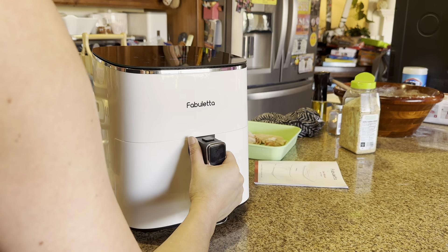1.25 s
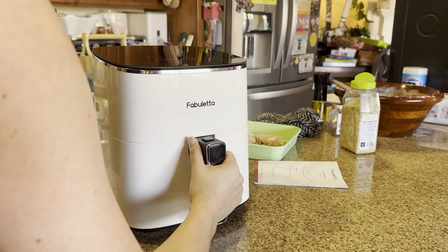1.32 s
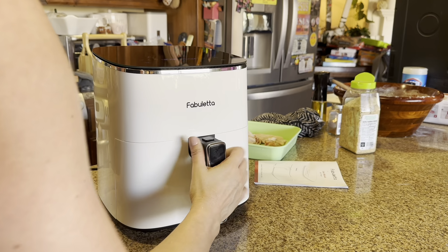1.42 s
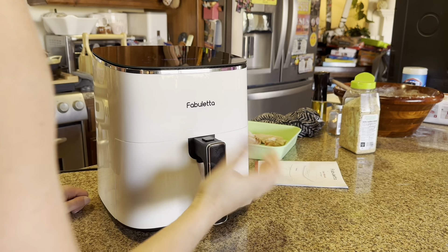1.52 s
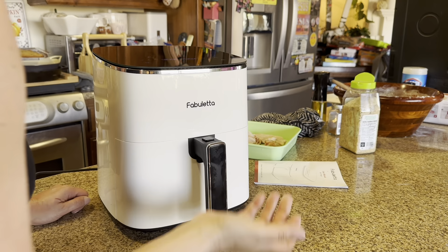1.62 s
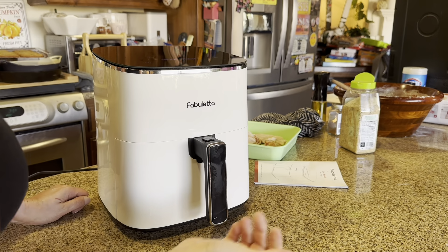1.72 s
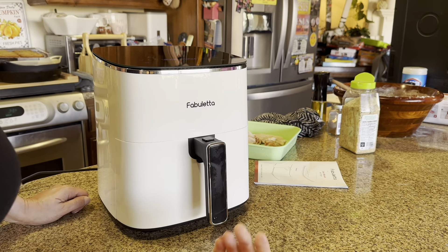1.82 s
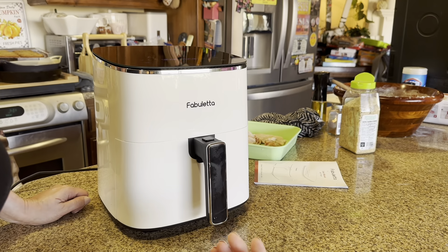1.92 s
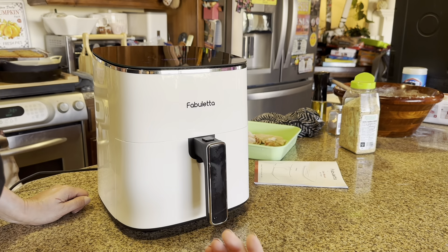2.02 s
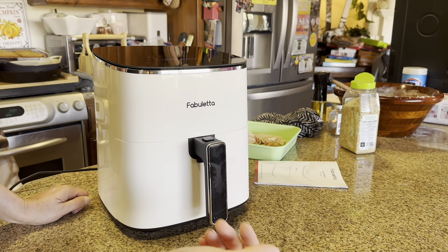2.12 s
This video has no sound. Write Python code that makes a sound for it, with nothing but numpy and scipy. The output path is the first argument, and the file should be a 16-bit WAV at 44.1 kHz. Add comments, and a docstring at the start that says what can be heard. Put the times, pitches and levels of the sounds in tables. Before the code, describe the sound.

An air fryer drawer slides in, knocking and scraping, then clunks and latches closed.

```python
"""Air fryer basket pushed home

Close up on a kitchen counter, the basket knocks and scrapes along its rails, ringing the pan and
rattling the plastic housing. It slams into the end stop, the latch snaps and its spring rings on.
A low boom lingers, the released handle ticks twice, and the small kitchen hums underneath.
Rings and thuds are decaying sines; clatter, clicks and scrape are shaped noise."""
import sys
import numpy as np
from scipy import signal
from scipy.fft import rfft, irfft, next_fast_len
from scipy.io import wavfile
from scipy.ndimage import uniform_filter1d

SR = 44100
rng = np.random.default_rng(int(sys.argv[2]) if len(sys.argv) > 2 else 0)


def unload_audio(sound):
    """Save the sound as a 16-bit wav file, at the path given as the first command line argument."""
    columns = np.transpose(np.atleast_2d(sound))
    # keep every value between -1 and 1, then stretch to whole-number steps
    steps = np.round(np.clip(columns, -1, 1) * 32767)
    wavfile.write(sys.argv[1], SR, steps.astype(np.int16))


N = 94815

# Hits on the rails, then on the end stop: (time [s], clatter [dB], ring [dB], contact low-pass [Hz],
# thud [dB], favoured pitch [Hz], ring length [ratio])
RAIL_HITS = [(.193, -28.5, -23.5, 1500, -44, 384, 0.96), (.2425, -23, -17.5, 1280, -32.5, 446, 1.08),
             (.277, -41, -30.5, 530, -46.5, 480, 0.25), (.4375, -25.5, -19.5, 2500, -22.5, 394, 0.61),
             (.451, -24, -26.5, 900, -21.5, 386, 0.45), (.502, -34, -29, 1010, -46.5, 480, 0.49),
             (.584, -41, -34.5, 1210, -31.5, 304, 1.1), (.667, -29, -34, 1200, -52.5, 690, 0.71),
             (.673, -25.5, -21.5, 820, -39, 387, 0.82), (.703, -37.5, -26, 700, -38.5, 415.3, 0.48),
             (.748, -30.5, -41.5, 2344, -47.5, 1500, 0.31), (.756, -28, -30.5, 1000, -35.5, 332, 1.2),
             (.802, -27.5, -27.5, 1100, -55, 595, 0.23), (.814, -23, -25, 1200, -32, 690, 1.2),
             (.843, -35, -33, 800, -44, 500, 0.81), (.916, -34, -31, 2628, -47, 600, 0.35),
             (.974, -28.5, -37, 2400, -51.5, 720, 0.37), (.994, -20.5, -19.5, 1400, -25.5, 720, 1.8),
             (1.024, -27.5, -40.5, 2000, -36, 330, .7)]
STOP_HITS = [(1.0485, -21, -18, 1450, -38, 590, 0.23), (1.060, -18, -28.5, 3000, -35, 1000, 0.48),
             (1.067, -15, -12, 1817, -17.5, 537, 0.8), (1.080, -18, -20, 992, -25, 260.4, .9),
             (1.092, -20.5, -29, 1400, -22.5, 740, 0.4), (1.119, -27.5, -25.5, 1200, -20.5, 890, 0.8)]
# Ring of the loose pan, then of the closed cooker: (pitch [Hz], level [dB], t60 [s])
PAN_MODES = [(261.1, 1.5, 0.14), (297.6, -4, 0.12), (348.7, -3, 0.077), (396.7, -6, 0.069),
             (481.9, -2.5, .2), (542, -6.5, 0.14), (640, -10.5, .08), (720, -12.5, .09), (875, -4.5, .08),
             (1019, -4, .07), (1117, -9.5, 0.069), (1292, -10, .09), (1610, -14, .1), (2100, -12, 0.12)]
COOKER_MODES = [(253.4, 4.5, 0.18), (362, -5.5, .13), (521.4, -2, .2), (568, -1.5, 0.077),
                (622.4, -4, 0.13), (690, -4.5, 0.11), (790, -5, .18), (855, -9, 0.24), (910, -11, 0.16),
                (1107, -9, .2), (1219, -4.5, .19), (1343, -8.5, 0.16), (1434, -11.5, 0.17), (1500, -8, .15)]
def basket():
    """The loose pan knocks along the rails, then hits the stop and rings the whole cooker."""
    return impacts(RAIL_HITS, PAN_MODES) + impacts(STOP_HITS, COOKER_MODES)


# Thud of the housing on its feet: (pitch [Hz], level [dB], t60 [s])
THUD_MODES = [(104.3, -9, 0.29), (124.9, 0.5, 0.31), (146.9, -0.5, 0.12), (184.8, 4.5, .16),
              (207.5, -9, 0.27), (264.6, -12, 0.3)]
# Tone of the plastic clatter: (frequency [Hz], gain [dB])
HOUSING_EQ = [(60, -34.5), (170, -6), (300, 3), (650, 0), (1000, -3.5), (1500, -7.5), (2100, -5.5),
              (3000, -11), (7000, -13.5), (16000, -17.5)]
def impacts(hits, body):
    """Each hit rattles the housing, rings the struck body and thuds through the feet."""
    out = np.zeros((2, N))
    thud = modes(THUD_MODES, size=16000)
    thud /= np.abs(thud).max()
    for s, clatter_db, ring_db, cutoff_hz, thud_db, favoured_hz, length in hits:
        clatter = burst(HOUSING_EQ, rise_s=0.00026, t60=0.074, size=6000)
        ring = body_ring(body, favoured_hz, length)
        add(out, s, set_attack(soften(clatter, cutoff_hz), clatter_db))
        add(out, s, set_attack(soften(ring, cutoff_hz), ring_db))
        add(out, s, thud * undb(thud_db))
    return out


FAVOUR_DB, FAVOUR_OCTAVES = 7, 0.18
def body_ring(body, favoured_hz, length):
    """Each contact point favours some modes; a pressed basket rings shorter."""
    hz, db, t60 = np.array(body).T
    boost_db = FAVOUR_DB * np.exp(-.5 * (np.log2(hz / favoured_hz) / FAVOUR_OCTAVES) ** 2)
    return modes(zip(hz, db + boost_db, t60 * length), size=14000)


# Sharp contacts of plastic edges and latch: (time [s], level [dB], low-pass [Hz])
EDGE_HITS = [(0.0615, -61, 9100), (0.1901, -42, 6900), (0.1973, -36.5, 2720), (0.2389, -48, 7000),
             (0.4399, -39, 8170), (0.4394, -23.5, 2100), (.613, -51, 5000), (0.6428, -47.5, 4920),
             (0.6683, -50.5, 6680), (0.746, -42.5, 7920), (0.9156, -37.5, 13100), (0.9734, -32.5, 10940),
             (1.0242, -41, 7000), (1.055, -28.5, 10000), (1.0606, -27.5, 16000), (1.066, -21.5, 15920),
             (1.068, -27, 14570), (1.094, -35, 8000)]
# Bright snap of hard plastic: (frequency [Hz], gain [dB])
SNAP_EQ = [(200, -14.5), (1500, 5), (3000, -1), (4500, -1.5), (6300, -0.5), (8100, 1.5), (9500, 3.5),
           (13000, 5.5), (16000, 3)]
def edge_clicks():
    """Hard edges meet in short, crisp snaps."""
    out = np.zeros((2, N))
    for s, db, cutoff_hz in EDGE_HITS:
        snap = burst(SNAP_EQ, rise_s=.00015, t60=0.028, size=3000)
        add(out, s, set_attack(soften(snap, cutoff_hz), db))
    return out


# Crack of the catch and zing of the spring: (frequency [Hz], gain [dB])
CATCH_EQ = [(1000, -26), (3500, -3.5), (5000, 1), (6300, 1), (7800, 6.5), (9300, -10), (12000, -1.5),
            (14000, 4), (16000, -2.5)]
SPRING_EQ = [(1500, -18.5), (3500, -8), (5600, 9), (6500, 8.5), (7600, 5), (8900, -18), (15000, -17.5)]
def latch():
    """The latch drops into its catch and the spring rings on."""
    out = np.zeros((2, N))
    catch = burst(CATCH_EQ, rise_s=0.00088, t60=0.0081, size=3000)
    spring = burst(SPRING_EQ, rise_s=0.003, t60=0.24, size=24000)
    add(out, 1.0767, set_attack(catch, db=-19))
    add(out, 1.080, set_attack(spring, db=-38.5))
    return out


# Fader rides for the rub of the rails and the hiss of the runners: (time [s], level [dB])
RUB_RIDE = [(0, -71.5), (.17, -64.5), (.25, -38.5), (.42, -103), (.48, -41), (.55, -39.5), (.64, -33.5),
            (.72, -41), (.8, -35.5), (.9, -41.5), (.97, -33), (1.05, -26), (1.12, -55.5), (1.25, -75)]
HISS_RIDE = [(0, -54.5), (.2, -53), (.42, -55.5), (.55, -66), (.65, -67.5), (.73, -63.5), (.77, -48),
             (.9, -47.5), (.94, -47.5), (1.05, -54.5), (1.15, -72.5)]
# Hollow tone of the rub: (frequency [Hz], gain [dB])
RUB_EQ = [(80, -10), (250, 5), (500, 6.5), (900, -2.5), (1900, -7), (3000, -16.5), (4500, -21.5),
          (8500, -24), (15000, -22.5)]
GRAINS_PER_S, GRAIN_SCATTER_DB = 5000, 1.8
JUDDER_DB, JUDDER_PER_S = 2, 90
def scrape():
    """Tiny catches roughen a hollow rub and a fine hiss; both judder as the basket sticks and slips."""
    catches = rng.random(N) < GRAINS_PER_S / SR
    strength = undb(GRAIN_SCATTER_DB * np.minimum(rng.exponential(size=N), 5))
    grains = unit(catches * strength)
    grit = np.sqrt(np.abs(uniform_filter1d(grains ** 2, size=40)))
    judder = np.interp(np.arange(N) / SR * JUDDER_PER_S, np.arange(1000), rng.standard_normal(1000))
    roughness = grit * undb(JUDDER_DB * judder)
    rub = unit(colour(noise(N) * roughness, RUB_EQ)) * fader(RUB_RIDE)
    hiss = unit(colour(noise(N) * roughness, SNAP_EQ)) * fader(HISS_RIDE)
    return rub + hiss


# Blows that wake the boom: (time [s], level [dB])
BOOM_HITS = [(0.2424, -50), (0.755, -38.5), (1.0655, -36)]
BOOM_HZ, BOOM_T60_S = 63.23, 1.7
ROCK_S, ROCK_DB, ROCK_HZ, ROCK_T60_S = .444, -28.5, 69, 0.25
def boom():
    """The cooker rocks at the first hard shove; heavier blows leave a long low ring."""
    out = np.zeros((2, N))
    add(out, ROCK_S, modes([(ROCK_HZ, ROCK_DB, ROCK_T60_S)], size=16000))
    for s, db in BOOM_HITS:
        add(out, s, modes([(BOOM_HZ, db, BOOM_T60_S)], size=N))
    return soften(out, cutoff_hz=200)


# Handle ticks: (time [s], level [dB])
HANDLE_HITS = [(1.8076, -52), (1.9657, -67)]
# Their thin tone: (frequency [Hz], gain [dB])
HANDLE_EQ = [(300, -11), (1500, -2), (2100, 4.5), (3200, -6.5), (3900, -2), (4350, 5.5), (5500, -11),
             (8800, -8), (11000, -14), (16000, -18)]
def handle_ticks():
    """The released handle settles with faint ticks."""
    out = np.zeros((2, N))
    for s, db in HANDLE_HITS:
        tick = burst(HANDLE_EQ, rise_s=.00015, t60=0.05, size=4000)
        add(out, s, set_attack(tick, db))
    return out


# Reverb decay: (frequency [Hz], t60 [s])
REVERB_DECAY = [(100, 0.49), (400, 0.35), (1500, 0.42), (7000, 0.46), (15000, .22)]
# Reverb tone: (frequency [Hz], gain [dB])
REVERB_EQ = [(100, -2.5), (300, -6.5), (700, -2), (1500, -2.5), (4000, 0.5), (8000, -1.5), (11000, -2.5),
             (15000, -2.5)]
REVERB_DB, PREDELAY_S, REVERB_RISE_S = -5, 0.0017, 0.0027
def room(x, size=26000):
    """Diffuse kitchen reverb, each octave with its own decay."""
    t = np.arange(size) / SR
    hz = np.arange(size // 2 + 1) * SR / size
    wash = rfft(noise(size, wider_db=3.5))
    octaves_hz = 62.5 * 2. ** np.arange(9)
    tail = np.zeros((2, size))
    for centre in octaves_hz:
        band = at_hz(list(zip(octaves_hz, octaves_hz == centre)), hz)
        tail += irfft(wash * band) * fade(t, at_hz(REVERB_DECAY, centre))
    tail *= np.clip((t - PREDELAY_S) / REVERB_RISE_S, 0, 1)
    response = colour(unit(tail), REVERB_EQ) / np.sqrt(size)
    return signal.fftconvolve(x, response, axes=-1)[:, :N] * undb(REVERB_DB)


# Dark bed of rumble: (frequency [Hz], gain [dB])
RUMBLE_EQ = [(18, -36), (30, -23.5), (53, -6), (90, -6.5), (124, -8.5), (145, -6), (239, -8.5), (404, -5.5),
             (540, -13), (584, -18.5), (721, -18), (9220, -50), (16000, -63.5)]
# Hum tones: (pitch [Hz], level [dB])
HUM_TONES = [(120, -62), (241, -65.5), (405, -66)]
RUMBLE_DB = -54.5
def room_tone():
    """Kitchen appliances rumble and hum steadily."""
    t = np.arange(N) / SR
    hum = sum(undb(db) * np.sqrt(2) * np.sin(2 * np.pi * (hz * t + rng.random()))
              for hz, db in HUM_TONES)
    return unit(colour(noise(N), RUMBLE_EQ)) * undb(RUMBLE_DB) + hum


# Stereo spread: (frequency [Hz], side minus mid [dB])
SPREAD = [(100, -17.5), (300, -14.5), (700, -8), (1400, -7), (3000, -1.5), (6000, 0), (9000, -6),
          (14000, -8.5)]
def noise(size, wider_db=0):
    """Stereo noise, narrow in the bass and wide in the treble."""
    mid, side = rfft(rng.standard_normal((2, size)))
    width = undb(at_hz(SPREAD, np.arange(len(mid)) * SR / size) + wider_db)
    left_right = mid + width * side * np.array([[1], [-1]])
    return irfft(left_right / np.sqrt(1 + width ** 2), size)


def burst(eq, rise_s, t60, size):
    """Crowded, quickly damped modes, played as a burst of shaped noise."""
    t = np.arange(size) / SR
    attack = 1 - np.exp(-t / rise_s)
    return colour(noise(size) * attack * fade(t, t60), eq)


def modes(table, size):
    """Struck modes as decaying sines; neighbours swing in opposite directions."""
    t = np.arange(size) / SR
    return sum((-1) ** k * undb(db) * np.sin(2 * np.pi * hz * t) * fade(t, t60)
               for k, (hz, db, t60) in enumerate(table))


def colour(x, eq):
    """Minimum-phase EQ through (frequency [Hz], gain [dB]) points."""
    n = next_fast_len(x.shape[-1] + 4096, True) // 2 * 2
    gain = undb(at_hz(eq, np.arange(n // 2 + 1) * SR / n))
    cepstrum = irfft(np.log(gain))
    cepstrum[1:n // 2] *= 2  # folded forward, so nothing rings ahead of a hit
    cepstrum[n // 2 + 1:] = 0
    return irfft(rfft(x, n) * np.exp(rfft(cepstrum)))[..., :x.shape[-1]]


def soften(x, cutoff_hz):
    """Low-pass: a softer contact excites less treble."""
    return signal.sosfilt(signal.butter(3, cutoff_hz, fs=SR, output="sos"), x)


def set_attack(x, db):
    """Set the rms level of a hit's first 10 ms."""
    return x * undb(db) / np.sqrt(np.mean(x[..., :SR // 100] ** 2))


def fade(t, t60):
    """Exponential decay by 60 dB in t60 seconds."""
    return np.exp(-np.log(1000) * t / t60)


def fader(ride):
    """Gain through (time [s], level [dB]) points, silent after the last."""
    return undb(np.interp(np.arange(N) / SR, *np.array(ride).T, right=-200))


def at_hz(points, hz):
    """Read a table on a log-frequency axis."""
    freqs, values = np.array(points, float).T
    return np.interp(np.log(np.maximum(hz, 1)), np.log(freqs), values)


def undb(db):
    """Decibels to gain."""
    return 10 ** (np.asarray(db) / 20)


def unit(x):
    """Scale to an rms of one."""
    return x / np.sqrt(np.mean(x ** 2))


def add(out, s, x):
    """Mix a sound in at s seconds."""
    i = int(s * SR)
    out[:, i:i + x.shape[-1]] += x[..., :N - i]


# Pan across the spectrum: (frequency [Hz], left minus right [dB])
PANNING = [(100, 0), (350, -0.74), (700, -0.1), (2800, -0.5), (5500, 3.5), (9000, 2), (14000, -0.2)]
LAG_S, LAG_TOP_HZ = 4.5e-5, 2500
def scene():
    """The basket in its kitchen, a little to the left."""
    close = basket() + edge_clicks() + latch() + handle_ticks() + scrape()
    left, right = close + room(close) + boom() + room_tone()
    hz = np.arange(N // 2 + 1) * SR / N
    lag_s = LAG_S / (1 + (hz / LAG_TOP_HZ) ** 2)  # the left ear leads in the lows and mids
    right = irfft(rfft(right) * np.exp(-2j * np.pi * hz * lag_s), N)
    return np.array([colour(left, [(f, db / 2) for f, db in PANNING]),
                     colour(right, [(f, -db / 2) for f, db in PANNING])])


# Overall tone: (frequency [Hz], gain [dB])
OUTPUT_EQ = [(20, -15), (45, -3), (60, 1), (9600, -0.5), (10300, -10), (11000, -29.5), (11700, -21),
             (12500, -14.5), (14000, -6.5), (16000, -10.5)]
CEILING, TOP_HZ = .92, 16000
def record(dry):
    """The loudest peaks are rounded, the treble has a deep notch near 11 kHz, and the top is cut."""
    rounded = dry / (1 + (dry / CEILING) ** 6) ** (1 / 6)
    high_cut = signal.ellip(10, .2, 80, TOP_HZ, fs=SR, output="sos")
    return signal.sosfilt(high_cut, colour(rounded, OUTPUT_EQ))


dry = scene()
out = record(dry)
unload_audio(out)
```